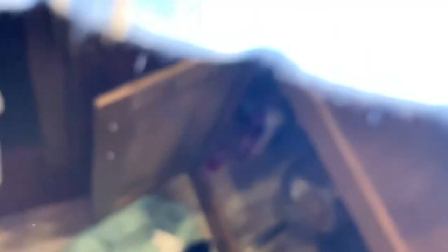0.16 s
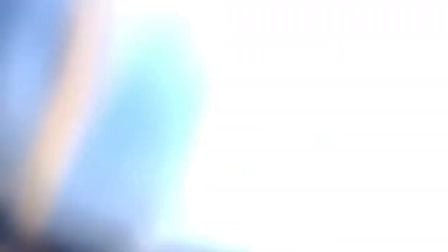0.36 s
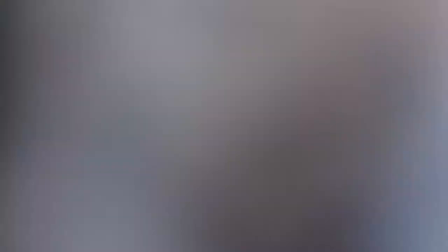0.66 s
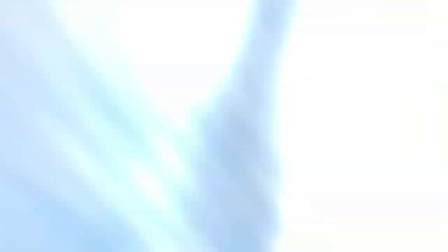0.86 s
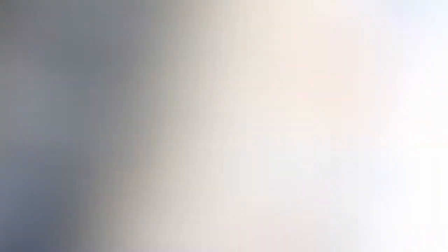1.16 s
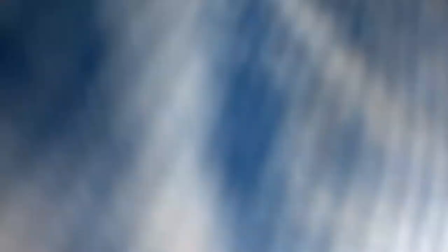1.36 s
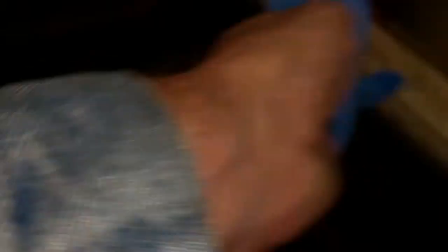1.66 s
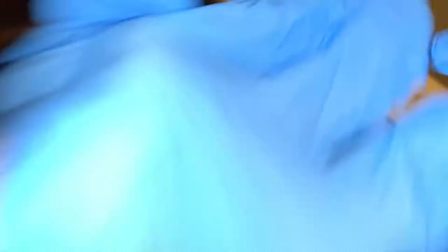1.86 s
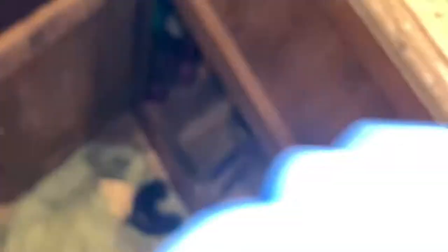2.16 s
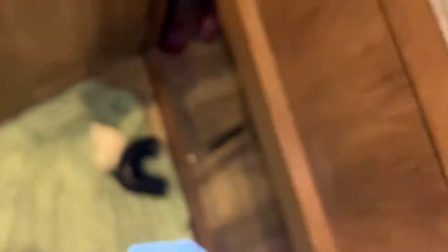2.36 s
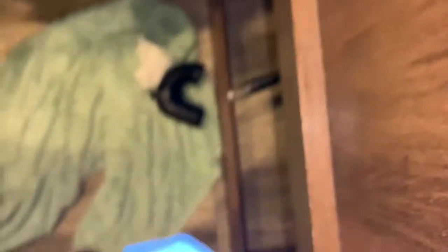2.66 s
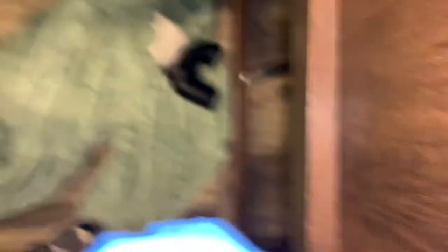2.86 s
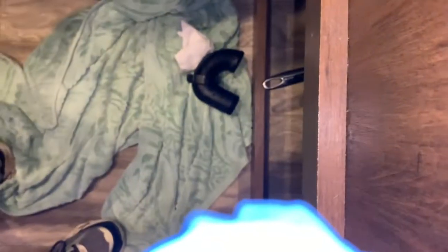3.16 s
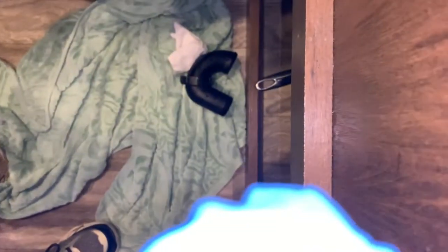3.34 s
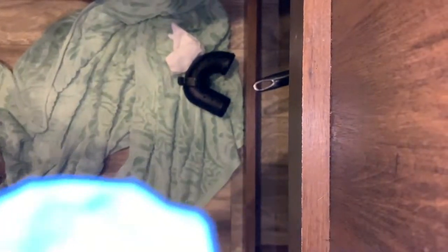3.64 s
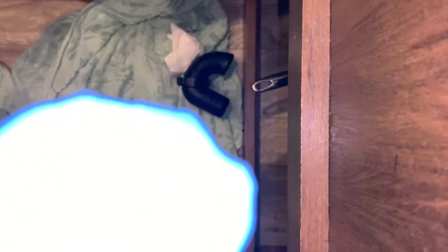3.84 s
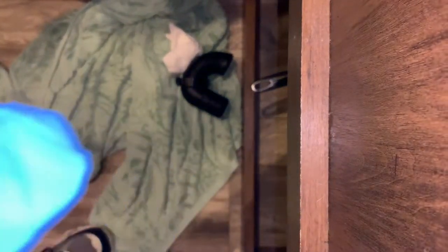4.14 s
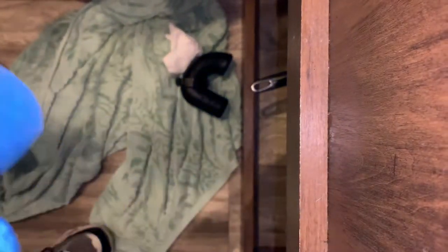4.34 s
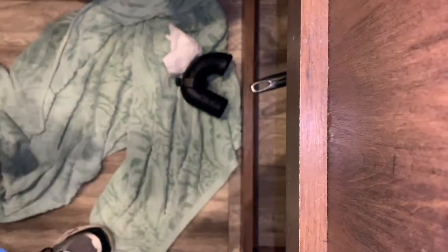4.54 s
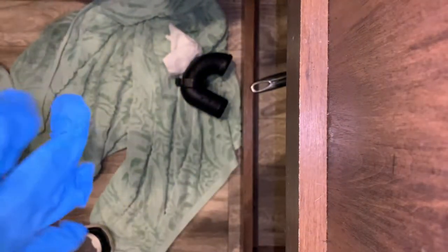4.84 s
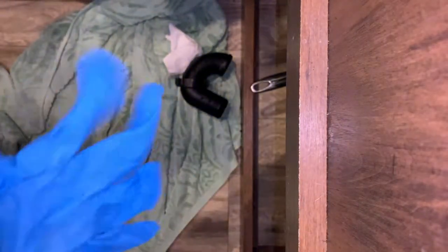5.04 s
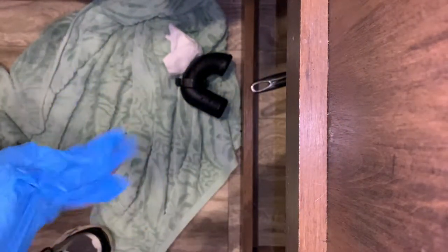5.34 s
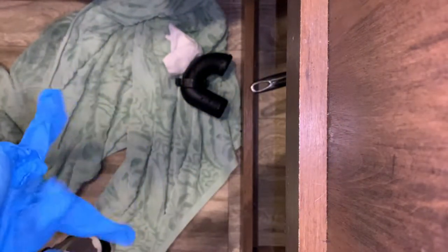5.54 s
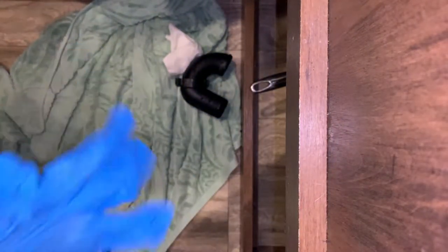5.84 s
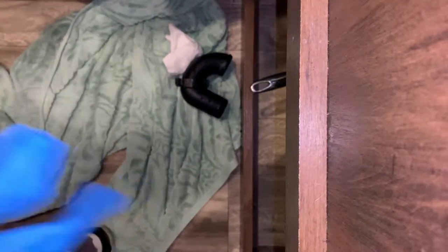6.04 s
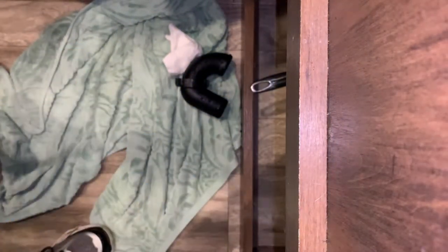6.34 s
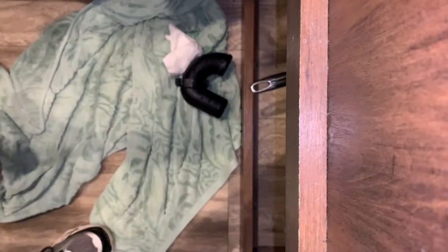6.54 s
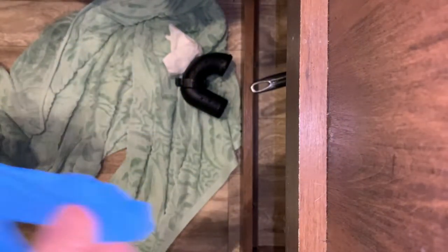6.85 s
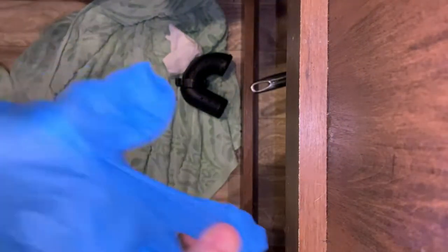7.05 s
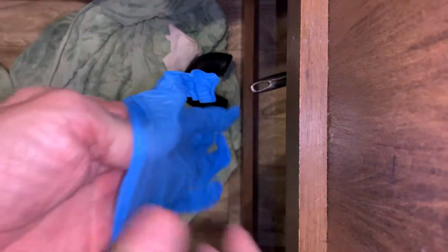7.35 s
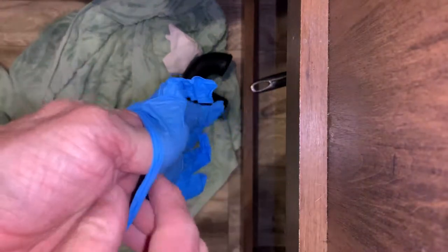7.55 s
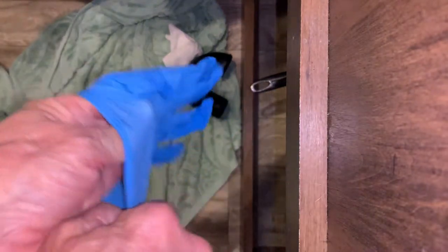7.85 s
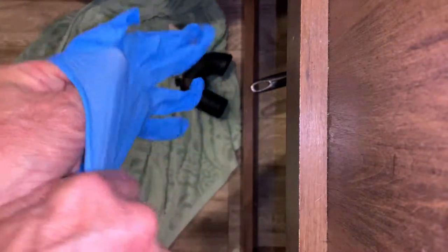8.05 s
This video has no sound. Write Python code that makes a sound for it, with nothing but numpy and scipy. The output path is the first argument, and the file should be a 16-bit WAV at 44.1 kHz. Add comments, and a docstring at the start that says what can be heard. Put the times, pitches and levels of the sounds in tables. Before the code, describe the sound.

Busy cloth and film friction opens the scene, strongest in the first second or so, with hollow shuffling in a wooden cabinet behind. One loud glove snap cracks out, scuffs and a woody thump follow, and the handling drops to very faint rustle. Later, quiet crisp crinkling, muffled fumbling and dry ticks return on the left, finishing with a tiny buzzing cuff drag. Close microphone, short room reflections.

```python
"""Rubber gloves pulled on beside a cabinet

Thin rubber gloves are picked up beside a wooden cabinet and worked onto the hands, close to a hand-held
microphone pair in a small, quiet room. Cloth and film slide past as clumps of tiny friction slips;
the film cracks in short noise bursts and flaps in thumps of falling pitch. Near the end the stretched
cuff judders over the skin, its slips ringing the film. Scuffs, hollow shuffling and wood lie behind."""
import sys
import numpy as np
from scipy import signal
from scipy.fft import rfft, irfft, next_fast_len
from scipy.io import wavfile
from scipy.ndimage import uniform_filter1d

SR = 44100
rng = np.random.default_rng(int(sys.argv[2]) if len(sys.argv) > 2 else 0)


def digitize_waveform(pressure):
    """Quantize a signal to 16-bit integers and store it at the path in sys.argv[1].

    Rows of a 2-D input are taken as channels; values are limited to [-1, 1].
    """
    field = np.atleast_2d(pressure).T
    bounded = np.clip(field, -1, 1)
    quanta = np.round(bounded * 32767).astype(np.int16)
    wavfile.write(sys.argv[1], SR, quanta)


N = 361619
TIME = np.arange(N) / SR
SIZE = next_fast_len(N + 8192)   # padded transform length
FREQS = np.maximum(np.arange(SIZE // 2 + 1) * SR / SIZE, 1)


def from_db(db):
    """Decibels to amplitude gain."""
    return 10 ** (np.asarray(db) / 20)


def rms_one(x):
    """Scale to unit rms."""
    return x / np.sqrt(np.mean(x ** 2) + 1e-20)


def in_time(rows):
    """Join each column of a time table by straight lines, giving a value at every sample."""
    s, *columns = np.transpose(rows)
    return [np.interp(TIME, s, column) for column in columns]


def over_hz(points):
    """Join a frequency table by straight lines over log frequency."""
    hz, value = np.transpose(points)
    return np.interp(np.log(FREQS), np.log(hz), value)


def drift(rate):
    """Random values of spread 1, drawn `rate` times a second and joined by straight lines."""
    knots = rng.standard_normal(4096)
    return np.interp(TIME * rate, np.arange(len(knots)), knots)


def panned(x, pan_db):
    """Lean a sound to the left by a level difference."""
    return x * from_db(np.array([[.5], [-.5]]) * pan_db)


# How alike left and right are.
# Each row: frequency in Hz, left-right likeness from 0 to 1.
LEFT_RIGHT_LIKENESS = [(60, 1), (250, 0.63), (600, 0.38), (1200, 0.13), (4500, 0.05), (6500, 0.91),
                       (8500, 1), (16000, 0.68)]


def coloured(pair, spectrum):
    """Mix a shared and a separate signal into left and right by likeness, and shape their spectrum."""
    shared, apart = rfft(pair, SIZE)
    alike = np.clip(over_hz(LEFT_RIGHT_LIKENESS), 0, 1)
    left_right = np.sqrt((1 + alike) / 2) * shared + np.sqrt((1 - alike) / 2) * apart * [[1], [-1]]
    # beyond its ends the table rolls off
    low_hz, high_hz = max(spectrum[0][0], 32), 2 * spectrum[-1][0]
    gain = from_db(over_hz(spectrum))
    gain = gain / np.hypot(1, (low_hz / FREQS) ** 3)
    gain = gain / np.hypot(1, (FREQS / high_hz) ** 2)
    return irfft(left_right * rms_one(gain), SIZE)[:, :N]


def resonate(x, modes):
    """Parallel two-pole resonances with alternating signs; each narrow mode rings on longer."""
    out = 0
    for k, (hz, width_hz, db) in enumerate(modes):
        r = np.exp(-np.pi * abs(width_hz) / SR)
        zeros = [(1 - r * r) / 2, 0, (r * r - 1) / 2]
        poles = [1, -2 * r * np.cos(2 * np.pi * hz / SR), r * r]
        out = out + (-1) ** k * from_db(db) * signal.lfilter(zeros, poles, x + 1e-18)
    return out


def patchy(x, depth_db, size=512, order=3):
    """The contact shifts from crease to crease, so patches of colour come and go."""
    *_, frames = signal.stft(x, nperseg=size)
    patches = rng.standard_normal(frames.shape[1:])
    patches = uniform_filter1d(patches, order, axis=0)
    patches = uniform_filter1d(patches, order, axis=1)
    return signal.istft(frames * from_db(depth_db * rms_one(patches)), nperseg=size)[1][:, :N]


def friction(spectrum, grains_per_s, spread_db, smooth_db, flutter_db, patch_db, level_db=0):
    """Tiny slips of uneven size come in clumps over a smooth sliding hiss."""
    born = rng.random(N) < grains_per_s / SR * from_db(4 * drift(45))
    sizes = from_db(spread_db * np.minimum(rng.exponential(1, N), 4))
    slips = rms_one(born * sizes * rng.choice([-1, 1], (2, N)))
    sliding = from_db(smooth_db) * rng.standard_normal((2, N))
    contact = (slips + sliding) * from_db(flutter_db * drift(70))
    return from_db(level_db) * rms_one(coloured(patchy(contact, patch_db), spectrum))


# Strokes of cloth or film sliding past, close to the microphones; levels before the trims in rubbing().
# Each row: middle in seconds, length in seconds, rasp in dB, dull rub in dB re rasp, crinkle in dB re rasp.
SLIDING_STROKES = [(0.01, 0.061, -50.5, 4.5, 4), (0.143, 0.13, -52.5, 5, -2), (0.293, 0.073, -57, 1, 2.5),
                   (0.457, 0.15, -40.5, -3, -7), (0.67, 0.068, -46.5, -5, -2.5),
                   (0.789, 0.24, -50.5, 1.5, -1.5), (1.01, 0.14, -63.5, -2, 8),
                   (1.089, 0.083, -45, 6.5, -9.5), (1.181, 0.073, -39, 1.5, -10),
                   (1.228, 0.077, -38, -0.5, -3), (1.39, 0.17, -60, -3, -0.5), (1.633, 0.027, -44, -19, -7),
                   (1.91, 0.071, -66.5, 12.5, 4.5), (2.018, 0.045, -48.5, 2.5, -2),
                   (2.122, 0.14, -53.5, 3, -4), (2.223, 0.049, -51.5, -10, 0.5),
                   (2.317, 0.21, -54.5, 6.5, -13), (2.68, 0.091, -61, 5, -7), (2.858, 0.39, -60, 0.5, -10),
                   (2.958, 0.054, -54.5, 10.5, -1), (3.055, 0.14, -62.5, -2.5, -7.5),
                   (3.24, .08, -68, -0.5, -8), (3.363, 0.084, -55.5, -3.5, -4.5),
                   (3.42, 0.019, -58.5, -13, 6), (3.662, 0.15, -61.5, 11, -2), (3.816, 0.16, -71, 16, -3),
                   (4.37, .11, -66, 6, -6), (4.536, 0.1, -65.5, 3, -0.5), (4.658, 0.15, -64.5, 1.5, 2),
                   (4.838, 0.13, -62, 4, 5.5), (5.113, 0.13, -60.5, 5, 10.5), (5.295, 0.088, -54, 2.5, 4),
                   (5.474, 0.097, -60.5, 5, 10.5), (5.726, .15, -59.5, 7, -4), (5.854, .09, -59.5, 6.5, 8),
                   (5.99, 0.15, -61.5, -11, 1), (6.074, 0.045, -49.5, -3, 4), (6.541, 0.1, -59, -8, 5),
                   (6.637, 0.13, -60, -3, 0), (6.84, 0.18, -63.5, 6.5, -9), (6.992, 0.16, -56, 5.5, -1),
                   (7.067, 0.021, -47.5, 4.5, 5), (7.201, 0.037, -55.5, 4.5, 12), (7.27, 0.12, -59, 7, 9),
                   (7.396, 0.076, -71, 11, 11.5), (7.581, 0.069, -72.5, 8, 16),
                   (7.696, 0.14, -71.5, 9.5, 11.5), (7.888, 0.16, -65, 5.5, 6.5), (8.065, 0.25, -65, 5, 13),
                   (8.158, 0.13, -59, 9, 4.5)]
# The light contact that goes on between strokes, before the trims here and in rubbing().
# Each row: time in seconds, level of rub and rasp in dB, level of crinkle in dB.
LIGHT_CONTACT = [(0.0, -51.5, -45), (0.36, -53, -58.5), (1.07, -80, -63), (1.21, -56.5, -56),
                 (1.8, -58, -62.5), (2.21, -64.5, -74), (2.47, -60.5, -70), (2.88, -65, -72.5),
                 (3.29, -66.5, -85), (3.7, -66.5, -71), (4.11, -69.5, -83.5), (5.18, -60, -50),
                 (5.98, -60, -64), (6.24, -64, -63), (6.92, -68, -79.5), (7.12, -61, -54),
                 (7.54, -73, -73.5), (8.2, -67, -65)]
CONTACT_RUB_DB, CONTACT_RASP_DB, CONTACT_CRINKLE_DB = -3.5, -4, -6.5   # trims on that contact
STROKE_RISE_SHARE, STROKE_ROUNDNESS = 0.51, 1.63   # share of length spent swelling; bell exponent


def pressure():
    """Gains of rub, rasp and crinkle: the power of every stroke adds to the light contact."""
    rasp_db, crinkle_db = in_time(LIGHT_CONTACT)
    contact_db = [rasp_db + CONTACT_RUB_DB, rasp_db + CONTACT_RASP_DB, crinkle_db + CONTACT_CRINKLE_DB]
    power = from_db(contact_db) ** 2
    for s, length_s, db, rub_db, crinkle_re_db in SLIDING_STROKES:
        near = slice(*np.searchsorted(TIME, [s - 2 * length_s, s + 2 * length_s]))
        along = (TIME[near] - s) / length_s
        off_middle = np.maximum(-along / STROKE_RISE_SHARE, along / (1 - STROKE_RISE_SHARE))
        swell = np.exp(-off_middle ** STROKE_ROUNDNESS)
        peaks = from_db([[db + rub_db], [db], [db + crinkle_re_db]])
        power[:, near] += (peaks * swell) ** 2
    return np.sqrt(power)


# Colours of the dull rub, the rasp and the crinkle. Each row: frequency in Hz, level in dB per Hz.
RUB_COLOUR = [(90, 4), (180, 0), (400, 1.5), (600, -1.5), (900, -7.5), (1300, -15.5), (2000, -33)]
RASP_COLOUR = [(700, -9.5), (1300, -5), (2000, 0), (3000, -4.5), (4200, -5), (5500, -8), (8000, -25)]
CRINKLE_COLOUR = [(3000, -14.5), (5000, -13), (6800, 3.5), (8500, -1.5), (10000, 0.5), (12000, -1.5),
                  (14000, 0.5), (16000, -5.5)]
# Where the hands are before the microphone pair. Each row: time in seconds, left minus right in dB.
HAND_PAN = [(0, 1), (1.2, 0), (2, -0.5), (3, 0.5), (4.5, 5), (5.2, 6), (6, 4.5), (7, 5), (7.6, 10.5),
            (8.2, 6.5)]


def rubbing(rub_gain, rasp_gain, crinkle_gain):
    """Broad contact gives a dull rub, edges rasp, and small creases crinkle."""
    pan_db, = in_time(HAND_PAN)
    rub = rub_gain * friction(RUB_COLOUR, grains_per_s=350, spread_db=3.0, smooth_db=2.5,
                              flutter_db=2.9, patch_db=2.5)
    rasp = rasp_gain * friction(RASP_COLOUR, grains_per_s=560, spread_db=3.0, smooth_db=3.0,
                                flutter_db=1.6, patch_db=2.0, level_db=1.0)
    crinkle = crinkle_gain * friction(CRINKLE_COLOUR, grains_per_s=2000, spread_db=2.0, smooth_db=-1,
                                      flutter_db=0.53, patch_db=4.5, level_db=1.5)
    return panned(rub + rasp, pan_db) + crinkle


# Taut film cracks, close up; levels before the trim and the colour below.
# Each row: start in seconds, peak in dB, treble lift in dB, decay to 1/e in seconds.
FILM_CRACKS = [(0.263, -30.5, -11, 0.0011), (0.6234, -32, -5.5, 0.00097), (0.917, -35.5, -2, .0006),
               (1.167, -19, -20, .002), (1.234, -26, 1, 0.00063), (1.257, -33, 3, .003),
               (1.386, -32, -5, 0.0065), (1.556, -33.5, -6, 0.0014), (1.633, -15, -12, 0.0038),
               (1.6369, -7.5, 6, 0.0023), (1.6415, -11.5, 9.5, 0.0011), (1.644, -17, -5, 0.0093),
               (1.992, -32, 2, 0.0006), (2.022, -32, -1, 0.0007), (2.0873, -21.5, -39, 0.0012),
               (2.1039, -9.5, -44, 0.0011), (2.107, -19, -38, 0.0028), (2.87, -38.5, -22, 0.0013),
               (2.947, -41, -4, 0.0014), (2.963, -28, -12, 0.0018), (3.252, -40.5, -11, 0.0011),
               (3.974, -51.5, 3, 0.0048), (5.478, -33.5, -9, 0.0019), (5.668, -32, -5, 0.00073),
               (5.903, -34.5, 7.5, 0.00068), (6.064, -41, 15.5, 0.0042), (6.074, -31.5, -8, 0.0047),
               (6.9183, -26.5, -28, 0.0018), (6.99, -27, -12, 0.0015), (7.0313, -29.5, -5, .0012),
               (7.042, -33, -8, 0.00054), (7.064, -34, -3, 0.0055), (7.103, -34, 1, 0.0047),
               (7.195, -38, 0, .003), (7.201, -40, -1, .0018), (7.288, -32.5, -11, .0022),
               (7.552, -56.5, 17, 0.0038), (8.061, -31, -9, 0.0025)]
# Colour of a crack. Each row: frequency in Hz, level in dB per Hz.
CRACK_COLOUR = [(150, 9.5), (550, 1), (1000, -1), (1450, -0.5), (1900, -2), (2500, -2.5), (3500, -10.5),
                (5500, -11.5), (7700, -8), (9300, 4), (11500, -8.5), (13500, -9), (15200, -7.5),
                (16000, -6.5)]


def cracks(split_hz=4500, level_db=-4):
    """Film slaps on skin: a short burst, from a dry tick to a smack that shivers on."""
    dull_power, bright_power = np.zeros(N), np.zeros(N)
    for s, db, lift_db, decay_s in FILM_CRACKS:
        at = int(s * SR)
        burst = from_db(db) * np.exp(-TIME[:min(N - at, SR // 10)] / decay_s)
        dull_power[at:at + len(burst)] += burst ** 2
        bright_power[at:at + len(burst)] += (burst * from_db(lift_db)) ** 2
    noise = rng.choice([-1., 1.], (2, N))
    low_pass = signal.butter(2, split_hz, fs=SR, output="sos")
    high_pass = signal.butter(2, split_hz, "high", fs=SR, output="sos")
    low = signal.sosfilt(low_pass, noise * np.sqrt(dull_power))
    high = signal.sosfilt(high_pass, noise * np.sqrt(bright_power))
    return from_db(level_db) * coloured(low - high, CRACK_COLOUR)


# Slack film flaps, close up. Each row: start in seconds, peak in dB, resting pitch in Hz.
FILM_FLAPS = [(0.146, -28, 54.5), (0.472, -32.5, 81), (0.522, -29, 60.6), (0.668, -33.5, 66),
              (0.746, -29.5, 60), (1.043, -24.5, 72.4), (1.071, -25.5, 46), (1.094, -28.5, 50.4),
              (1.161, -31.5, 77.5), (1.229, -28, 81), (1.6397, -18.5, 80.7), (2.018, -28.5, 68.6),
              (2.106, -27, 52), (2.865, -39, 65.4), (2.9639, -14.5, 52.2), (2.981, -24, 52.3),
              (5.481, -38.5, 54), (5.836, -39, 163), (6.067, -37.5, 164), (6.916, -33, 182.4),
              (7.006, -35.5, 118), (7.065, -30, 77), (7.109, -31, 67.4), (7.291, -35.5, 103),
              (8.063, -32.5, 139)]
# starting pitch above rest, in resting pitches, at this level; power of the strength it grows with
FLAP_STRETCH, FLAP_STRETCH_AT_DB, FLAP_STRETCH_GROWS = 2.3, -29, 0.5


def flaps(glide_s=0.0072, rise_s=0.002506, swings=0.8, puff_db=-19):
    """Released film swings; a harder flap starts higher, and the pitch falls as the tension runs out."""
    thumps, puffs = np.zeros(N), np.zeros(N)
    for s, db, end_hz in FILM_FLAPS:
        at = int(s * SR)
        t = TIME[:min(N - at, SR // 5)]
        stretch = FLAP_STRETCH * from_db(FLAP_STRETCH_GROWS * (db - FLAP_STRETCH_AT_DB))
        hz = end_hz * (1 + stretch * np.exp(-t / glide_s))
        # fades to 1/e in `swings` resting periods
        swing = (1 - np.exp(-t / rise_s)) ** 2 * np.exp(-t * end_hz / swings)
        swing = from_db(db) * swing / swing.max()
        thumps[at:at + len(t)] += swing * np.sin(2 * np.pi * np.cumsum(hz) / SR)
        puffs[at:at + len(t)] += swing
    puff_colour = [(100, -1), (250, 2.5), (550, -3.5), (1000, -33.5), (2500, -48.5)]   # Hz, dB per Hz
    puff = coloured(puffs * rng.standard_normal((2, N)), puff_colour)
    return thumps + from_db(puff_db) * puff


# The cuff dragged over skin, close up. Each row: time in seconds, mean slips per second, level in dB
# before the trim below.
CUFF_JUDDER = [(8.11, 190, -75), (8.124, 220, -43), (8.14, 170, -37), (8.16, 165, -37), (8.176, 200, -38),
               (8.183, 90, -66), (8.2, 120, -64.5)]
# Resonances of the stretched cuff. Each row: frequency in Hz, width in Hz, level in dB.
CUFF_MODES = [(519, 160, 7), (760, 250, 1.5), (1442, 140, 2), (2080, 200, -7.5), (2594, 400, -15),
              (4207, 1500, -23)]


def judder(jitter=.08, grit_db=-33, level_db=-5, pan_db=4):
    """The cuff sticks and slips on the skin; each slip rings the stretched film."""
    per_s, db = in_time(CUFF_JUDDER)
    turns = np.cumsum(per_s * (1 + jitter * drift(150))) / SR
    slips = np.diff(np.floor(turns), prepend=0)   # one click at each whole turn
    grit = from_db(grit_db) * rng.standard_normal((2, N))
    return panned(from_db(db + level_db) * rms_one(resonate(slips + grit, CUFF_MODES)), pan_db)


# Muffled colour of the hand moving inside the slack glove. Each row: frequency in Hz, level in dB per Hz.
MUFFLED_COLOUR = [(120, -7), (170, 8), (250, 1.5), (330, -25), (600, -30)]
HAND_IN_S, HAND_IN_RISE_S = 4.84, 0.46   # the fingers enter the slack glove
FUMBLE_DB, FUMBLE_PER_RUB_DB = -65.5, -1.5   # steady fumbling; share that follows the dull rub


def fumbling(rub_gain):
    """Once the hand is inside, slack film buckles round the fingers in soft, lumpy pats, more with each rub."""
    inside = np.clip((TIME - HAND_IN_S) / HAND_IN_RISE_S, 0, 1)
    gain = inside * np.hypot(from_db(FUMBLE_DB), from_db(FUMBLE_PER_RUB_DB) * rub_gain)
    return gain * friction(MUFFLED_COLOUR, grains_per_s=120, spread_db=5.5, smooth_db=-13.0,
                           flutter_db=-2.5, patch_db=5.0)


# Soft scuffs against the cabinet.
# Each row: middle in seconds, half length in seconds, resonance in Hz, its width in Hz, level in dB.
CABINET_SCUFFS = [(0.266, 0.0054, 1106, 90, -43.5), (2.222, 0.031, 894, 250, -52.5),
                  (2.227, 0.021, 335, 100, -47), (2.314, 0.032, 333, 151, -43.5),
                  (2.33, 0.021, 790, 220, -49), (2.556, 0.024, 1230, 447, -52.5),
                  (2.689, 0.041, 1180, 453, -56.5), (2.797, 0.023, 1400, 455, -62)]


def scuffs(flutter_db=1.6):
    """Each scuff swells and fades in one hollow resonance."""
    out, contact = 0, rng.standard_normal((2, N)) * from_db(flutter_db * drift(90))
    for s, half_s, hz, width_hz, db in CABINET_SCUFFS:
        mode = [(hz, width_hz * np.sqrt(2), 0)]   # widened, as it is passed twice
        swell = np.exp(-np.minimum(((TIME - s) / half_s) ** 2, 20))
        out = out + from_db(db) * swell * rms_one(resonate(resonate(contact, mode), mode))
    return out


# Shuffling heard in the open cabinet. Each row: time in seconds, level in dB.
CABINET_SHUFFLE = [(0, -57.5), (.5, -61), (.95, -60.5), (1.2, -57), (1.45, -53.5), (1.75, -55.5),
                   (1.95, -59.5), (2.15, -73), (2.4, -58.5), (2.5, -59), (2.85, -60.5), (3.1, -81.5),
                   (3.6, -71), (4.2, -76), (8.2, -81.5)]
# Resonances of its hollow. Each row: frequency in Hz, width in Hz, level in dB.
CABINET_HOLLOW = [(367, 74, 8.5), (407, 84, 8), (470, 21, 8), (720, 45, -7), (906, 89, -7),
                  (1158, 30, -0.5), (1371, 22, 1), (1630, 50, -4), (1830, 16, -5.5), (1820, 31, -17.5),
                  (2370, 19, -11.5), (2640, 35, -17)]
# Bumps against the cabinet. Each row: start in seconds, level in dB added to every panel mode.
CABINET_BUMPS = [(2.869, -15.5), (2.9668, 1.5)]
# Modes of the wooden panel. Each row: frequency in Hz, level in dB, 60 dB decay time in seconds.
PANEL_MODES = [(85.1, -34, 0.65), (171.2, -30, 0.26), (292, -44, 0.19), (518, -27, 0.063), (714, -53, 0.04),
               (2560, -49.5, 0.033)]


def cabinet():
    """The hollow colours nearby shuffling, and a wooden panel rings after each bump."""
    db, = in_time(CABINET_SHUFFLE)
    out = from_db(db) * rms_one(resonate(rng.standard_normal((2, N)), CABINET_HOLLOW))
    t = TIME[:SR]
    ring = sum(from_db(mode_db - 60 * t / t60_s) * np.sin(2 * np.pi * hz * t)
               for hz, mode_db, t60_s in PANEL_MODES)
    for s, bump_db in CABINET_BUMPS:
        at = int(s * SR)
        out[:, at:at + len(t)] += from_db(bump_db) * ring
    return out


# Narrow resonances that the near wooden walls add to the glove sounds.
# Each row: frequency in Hz, width in Hz, level in dB before the trim below.
WALL_MODES = [(506, 9.1, -4), (725, 9.7, 0.5), (1136, 12, -5), (1400, 62, 1), (1660, 81, -12),
              (2515, 55, -2.5), (2940, 55, -10)]


def wooden_walls(glove, level_db=-2, delay_s=0.00299):
    """The glove sounds reach the near wood a little late and ring its narrow resonances."""
    late = np.array([np.interp(TIME - delay_s, TIME, side, left=0) for side in glove])
    return from_db(level_db) * resonate(late, WALL_MODES)


ROOM_T60_S, ROOM_DB = 0.2734, -13


def room(x, split_hz=3500, gap_s=0.0044, treble_t60_s=0.16, treble_db=-1.0):
    """Dense reflections of the small room, different left and right; the treble dies first."""
    t = TIME[:SR // 2]
    echoes = rng.standard_normal((2, len(t))) * (t > gap_s)
    low_pass = signal.butter(4, split_hz, fs=SR, output="sos")
    high_pass = signal.butter(2, split_hz, "high", fs=SR, output="sos")
    decay = from_db(-60 * t / ROOM_T60_S)
    body = signal.sosfilt(low_pass, echoes) * decay
    treble = signal.sosfilt(high_pass, echoes) * from_db(treble_db - 60 * t / treble_t60_s)
    reflections = (body - treble) / np.sqrt(np.sum(decay ** 2))
    return from_db(ROOM_DB) * signal.fftconvolve(x, reflections, axes=1)[:, :N]


# Colour of the quiet room noise. Each row: frequency in Hz, level in dB per Hz.
AIR_COLOUR = [(15, -33), (25, -11), (43, -1), (82, -1.5), (217, -19.5), (405, -18), (754, -23.5),
              (1700, -27), (2000, -33), (3620, -41.5), (3920, -36), (4250, -38), (8590, -44), (9320, -55),
              (16000, -77.5)]


def room_air(level_db=-54.5):
    """Steady noise of the quiet room, shaped to its colour."""
    return from_db(level_db) * rms_one(coloured(rng.standard_normal((2, N)), AIR_COLOUR))


def scene():
    """Gloves close up, their blows echoing in the room, over the cabinet and the room noise."""
    blows = flaps() + cracks() + judder()
    rub_gain, rasp_gain, crinkle_gain = pressure()
    glove = blows + rubbing(rub_gain, rasp_gain, crinkle_gain)
    near = glove + wooden_walls(glove) + fumbling(rub_gain)
    return near + room(blows) + scuffs() + cabinet() + room_air()


# Phase between left and right. Each row: frequency in Hz, lead of the left in radians.
LEFT_LEAD = [(0, 0), (60, .3), (130, 1.1), (260, 1.8), (560, 1.9), (1000, 4.8), (1700, 5.4), (4400, 12.5),
             (5400, 15.3), (6100, 12.6), (16000, 0)]
CUTOFF_HZ = 16000


def record(dry):
    """Left and right differ in phase, which widens the sound; the top is cut steeply."""
    lead = np.interp(FREQS, *np.transpose(LEFT_LEAD))
    turn = np.exp(1j * lead * np.array([[.5], [-.5]]))
    top = 1 / np.hypot(1, (FREQS / CUTOFF_HZ) ** 120)
    return irfft(rfft(dry, SIZE) * turn * top, SIZE)[:, :N]


dry = scene()
out = record(dry)
digitize_waveform(out)
```